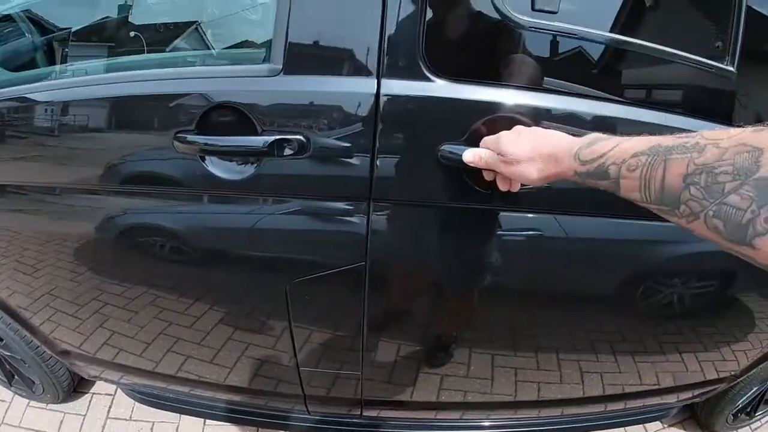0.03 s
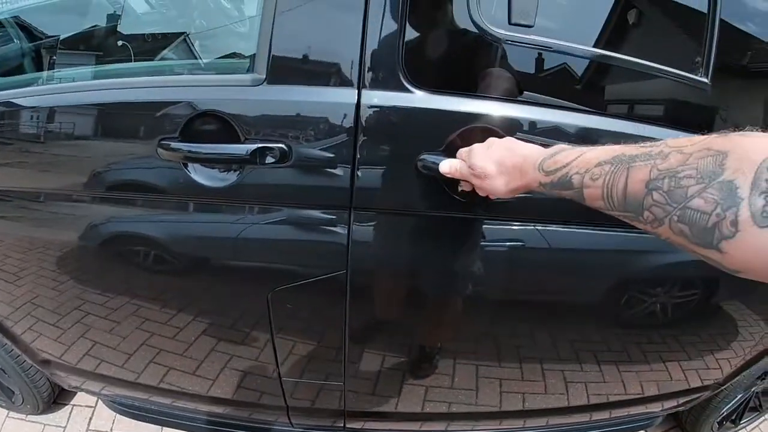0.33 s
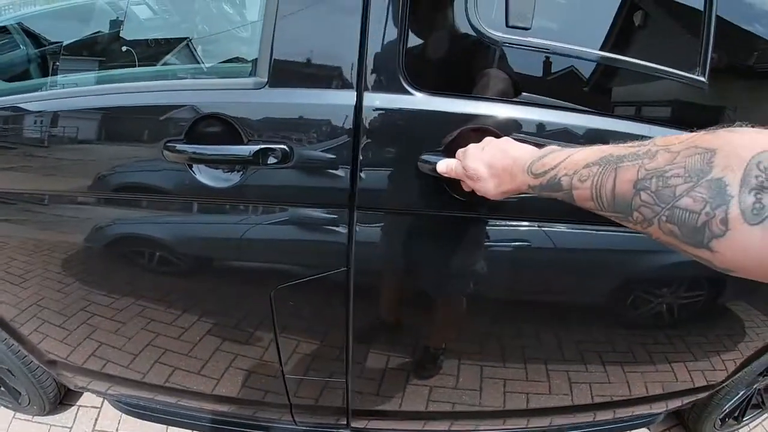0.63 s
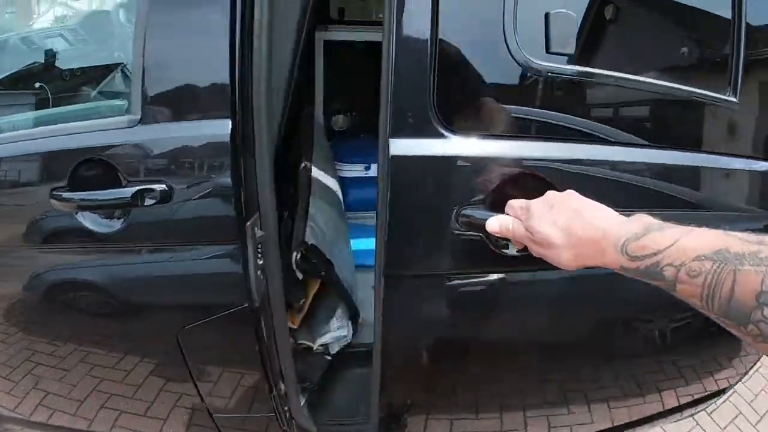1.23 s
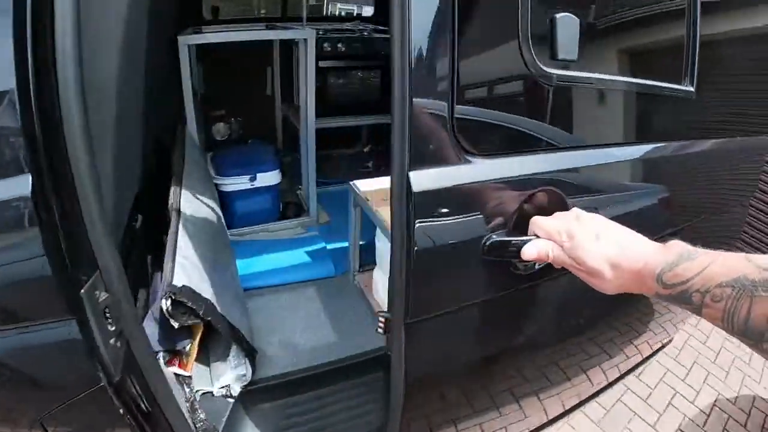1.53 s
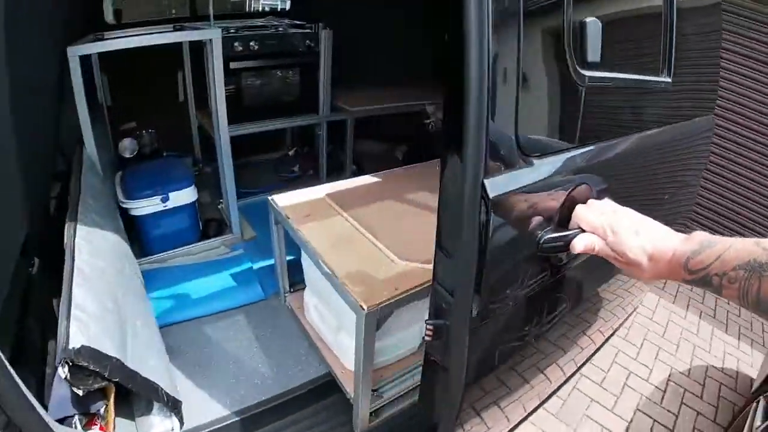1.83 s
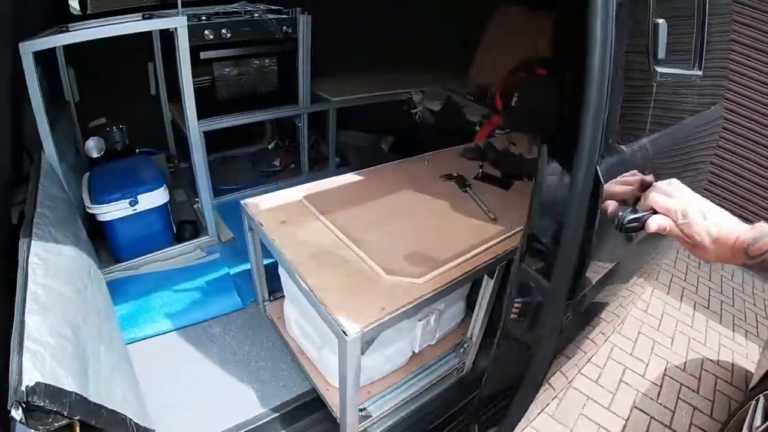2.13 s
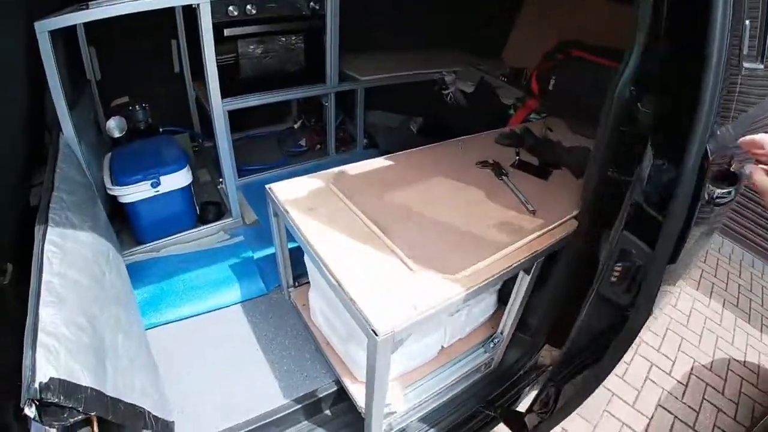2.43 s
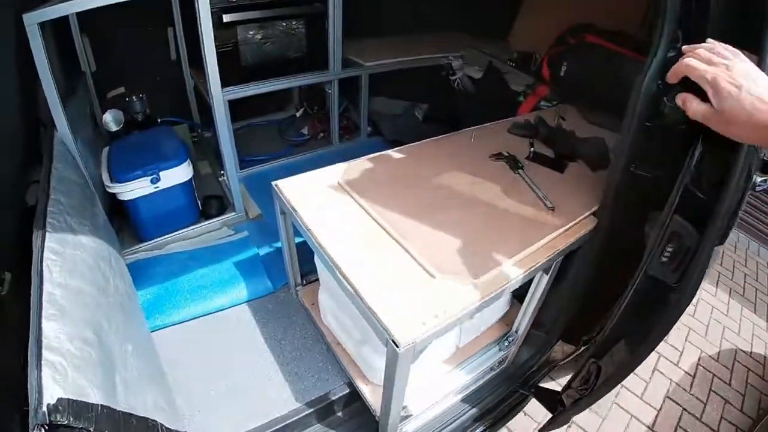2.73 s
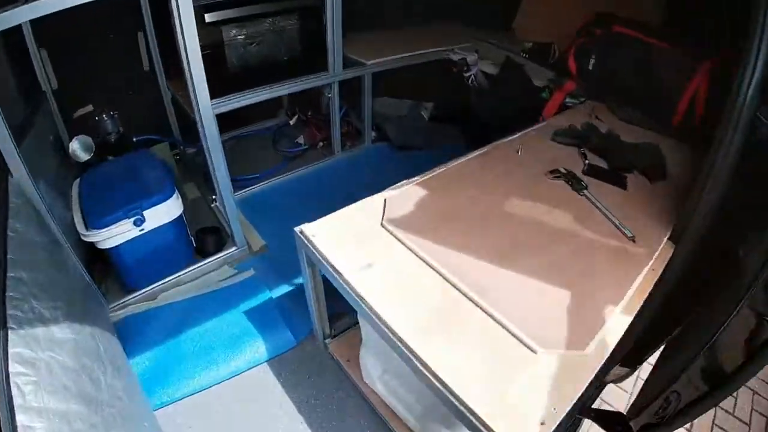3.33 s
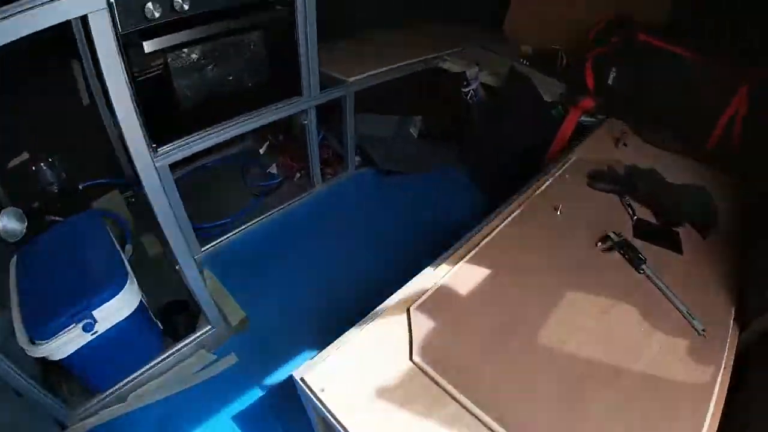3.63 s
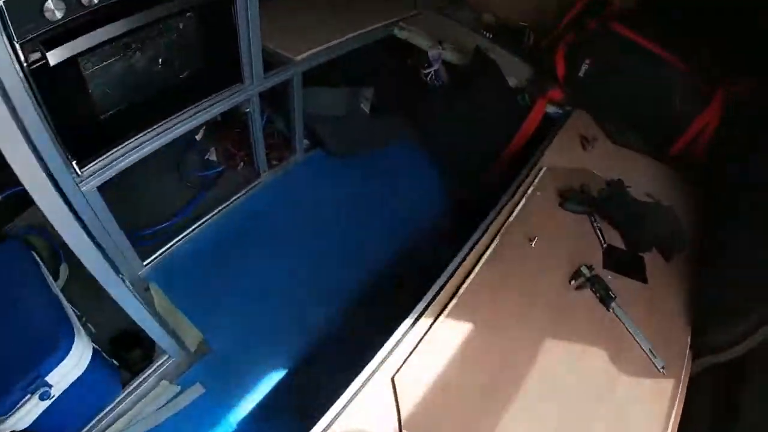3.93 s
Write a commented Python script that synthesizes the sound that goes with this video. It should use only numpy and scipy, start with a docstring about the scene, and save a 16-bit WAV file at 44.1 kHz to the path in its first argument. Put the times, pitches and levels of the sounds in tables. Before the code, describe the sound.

A van's sliding door unlatches, rumbles along its rail and clacks into its catch.

```python
"""A van's sliding door

The door is opened from outside, close to a microphone in light wind. The handle ticks, the latch
lets go with a clunk and the seal peels off; the door rumbles along its rail, bumps, and scrapes into
the hold-open catch. Two footfalls follow on the step. Impacts excite damped modes; rolling, peeling
and rubbing are trains of tiny random contacts, filtered by the bodies they excite."""
import sys
import numpy as np
from scipy.fft import rfft, irfft, next_fast_len
from scipy.io import wavfile
from scipy.ndimage import map_coordinates

SR = 44100
rng = np.random.default_rng(int(sys.argv[2]) if len(sys.argv) > 2 else 0)


def int16_out(signal):
    """Quantize to a 16-bit WAV file."""
    q = np.round(np.clip(np.atleast_2d(signal).T, -1, 1) * 32767)
    wavfile.write(sys.argv[1], SR, q.astype(np.int16))


N = 176400


def amp(db):
    """Amplitude ratio of a level in decibels."""
    return 10 ** (np.asarray(db) / 20)


def unit(x):
    """Normalisation to rms 1."""
    return x / np.sqrt(np.mean(x ** 2) + 1e-20)


def along(points, hz):
    """Interpolation of (f/Hz, value) points on a logarithmic frequency axis."""
    f, values = np.transpose(points)
    return np.interp(np.log(hz + 1), np.log(f + 1), values)


def curves(rows):
    """Linear interpolation in time: one curve for each column after t/s."""
    times, *columns = np.transpose(rows)
    return [np.interp(np.arange(N) / SR, times, column) for column in columns]


def wobble(per_s):
    """Smooth random modulation: a spline through per_s Gaussian values a second."""
    return map_coordinates(rng.standard_normal(2048), [np.arange(N) * per_s / SR], mode="wrap")


def filtered(x, response):
    """Linear filtering: the spectrum of x times a frequency response."""
    size = next_fast_len(len(x) + SR // 4)
    return irfft(rfft(x, size) * response(np.fft.rfftfreq(size, 1 / SR)), size)[:len(x)]


def coloured(x, spectrum):
    """Spectral shaping by (f/Hz, level/dB) points, at rms 1."""
    return unit(filtered(x, lambda hz: amp(along(spectrum, hz))))


def resonate(x, modes):
    """Forced response of parallel resonators (f/Hz, bandwidth/Hz, level/dB)."""
    return filtered(x, lambda f: sum(amp(db) * 1j * f * width / (f0 * f0 - f * f + 1j * f * width)
                                     for f0, width, db in modes))


def grit(per_s):
    """Shot noise: random tiny contacts of uneven size, at rms 1."""
    return unit((rng.random(N) < per_s / SR) * rng.standard_normal(N))


def decay(t, t60, attack_s=0.0014):
    """Exponential damping, 60 dB in t60 seconds, after a quick rise."""
    return np.exp(-np.log(1000) * t / t60) * (1 - np.exp(-t / attack_s))


def blow(spectrum, t60, tilt_db=0):
    """Impact on a panel: dense modes, the high ones dying first; t60 holds at 400 Hz."""
    t = np.arange(SR // 2) / SR
    octave = np.log2(np.fft.rfftfreq(len(t), 1 / SR) + 1)
    noise, out = rfft(rng.standard_normal(len(t))), 0
    for hz in 50 * 2 ** np.arange(9):
        band = irfft(noise * np.cos(np.pi / 2 * np.clip(octave - np.log2(hz), -1, 1)), len(t))
        ratio = hz / 400
        fade = decay(t, t60 / ratio ** 0.3)
        band_db = along(spectrum, hz) + tilt_db * np.log2(min(ratio, 4))
        out = out + unit(band * fade) * np.sqrt(np.mean(fade ** 2)) * amp(band_db)
    return out


def ring(hz, t60):
    """Free vibration of one damped mode."""
    t = np.arange(SR // 2) / SR
    return np.sin(2 * np.pi * hz * t) * decay(t, t60)


def add(out, s, x):
    """Superposition of x on out from time s."""
    part = out[max(round(s * SR), 0):][:len(x)]
    part += x[:len(part)]


# gusts and finest treble hiss (t/s, level/dB)
GUSTS = [(0, -27.5), (0.36, -22.5), (0.45, -35), (0.56, -36), (0.64, -23), (0.9, -27.5), (1.06, -29.5),
         (1.14, -44), (1.24, -32.5), (1.34, -24.5), (1.5, -27.5), (1.56, -23), (1.62, -20.5), (1.7, -20),
         (1.78, -30.5), (1.91, -18.5), (2.04, -33.5), (2.15, -22), (2.45, -26.5), (2.62, -25.5),
         (2.94, -22.5), (3.03, -37.5), (3.28, -22), (3.42, -29), (3.54, -25.5), (3.61, -29), (3.74, -26),
         (3.88, -34.5), (4, -46)]
FIZZ = [(0, -58), (0.12, -66), (0.3, -68), (0.6, -79), (1.0, -91), (3.5, -93.5), (3.6, -61), (3.66, -82),
        (3.85, -72.5), (4, -81)]
# street background (t/s, murmur level/dB, hiss level/dB)
STREET = [(0, -40, -51.5), (0.3, -40.5, -54), (0.55, -38.5, -52.5), (1.0, -41, -56.5), (1.6, -38, -56.5),
          (1.9, -37.5, -60.5), (2.7, -38.5, -61.5), (3.05, -44.5, -60), (3.3, -42.5, -62),
          (3.85, -41.5, -60), (4, -41, -61)]
# their spectra (f/Hz, level/dB)
GUST_SPECTRUM = [(3, -34.5), (12, 4), (25, -3.5), (40, -1), (60, -4), (110, -5.5), (170, -11.5), (260, -20),
                 (450, -30.5), (1000, -46.5), (3000, -79)]
FIZZ_SPECTRUM = [(3000, -26), (6000, 3.5), (9700, -3), (11000, -4.5), (15000, -11.5)]
MURMUR_SPECTRUM = [(40, -6.5), (200, 2.5), (340, 2.5), (450, -6.5), (800, -2.5), (1400, -10), (2300, -15),
                   (3000, -23), (6000, -41), (9000, -60)]
HISS_SPECTRUM = [(300, -13), (1500, -4.5), (2400, 1.5), (3500, 0.5), (5800, -6), (7000, -19.5), (9700, -15),
                 (11000, -27.5), (15000, -44)]

def outdoors():
    """Turbulent pressure: wind buffets the microphone over the broadband noise of the street."""
    gust_db, = curves(GUSTS)
    murmur_db, hiss_db = curves(STREET)
    fizz_db, = curves(FIZZ)
    gusts = amp(gust_db + 0.67 * wobble(17)) * coloured(rng.standard_normal(N), GUST_SPECTRUM)
    murmur = amp(murmur_db + 1.2 * wobble(14)) * coloured(rng.standard_normal(N), MURMUR_SPECTRUM)
    hiss = amp(hiss_db + 0.51 * wobble(20)) * coloured(rng.standard_normal(N), HISS_SPECTRUM)
    fizz = amp(fizz_db) * coloured(rng.standard_normal(N), FIZZ_SPECTRUM)
    return gusts + murmur + hiss + fizz


# rustle as arm and body move (t/s, level/dB) and its spectrum (f/Hz, level/dB)
RUSTLE = [(0.15, -70), (0.25, -50), (0.4, -52), (0.52, -66), (3.05, -70.5), (3.16, -43.5), (3.24, -51.5),
          (3.3, -48), (3.38, -60), (3.48, -37.5), (3.59, -62), (3.64, -58), (3.72, -50), (3.8, -67),
          (3.96, -47.5), (4, -65)]
RUSTLE_SPECTRUM = [(200, -16), (550, -9.5), (850, 4), (1200, 0), (1700, 0), (2600, -11.5), (4500, -21.5),
                   (8000, -36.5), (13000, -48)]

def clothing():
    """Friction noise: cloth rubs in small uneven clumps."""
    db, = curves(RUSTLE)
    return amp(db + 3.4 * wobble(42)) * coloured(grit(1800), RUSTLE_SPECTRUM)


# knocks on handle, arm and rail (t/s, level/dB, tilt/(dB/octave), t60/s)
KNOCKS = [(0.171, -29, -6, 0.083), (0.2252, -23, -2, 0.086), (0.244, -28, -0.5, 0.11),
          (0.2587, -27.5, 5.5, 0.06), (0.329, -28, 6, 0.057), (0.392, -27, 5, 0.078),
          (0.616, -30, -8.5, 0.055), (0.805, -21, -7, 0.035), (1.222, -29.5, 1, 0.062),
          (1.265, -20, -0.5, 0.14), (1.356, -25.5, -6, 0.083), (1.423, -23.5, 1.5, 0.099),
          (1.463, -20.5, -1, 0.077), (1.483, -25.5, -8, 0.061), (1.497, -21.5, 0, 0.13),
          (1.602, -20, -4, 0.11), (1.619, -25, -3.5, 0.17), (1.686, -22.5, -2, 0.037),
          (1.725, -26.5, -7, 0.086), (1.825, -23.5, -4, 0.069), (1.886, -22, -1.5, 0.081),
          (2.134, -22, 4.5, 0.082), (2.319, -23, -2, 0.11), (2.504, -20.5, 1, 0.13),
          (2.5145, -15.5, -1.5, 0.055), (2.54, -22, 8, 0.049), (2.685, -25.5, 0.5, 0.067),
          (2.711, -20.5, 7, 0.072), (2.731, -22.5, 8, 0.043), (2.755, -33.5, -9.5, 0.1),
          (2.794, -27.5, -5.5, .09), (2.829, -22.5, -3.5, 0.13), (2.836, -25.5, 11.5, 0.041),
          (2.864, -30, 9.5, 0.088), (2.895, -24, 6.5, 0.038)]
# snaps of handle and roller arm, ticks of metal fittings (t/s, level/dB)
SNAPS = [(0.178, -36.5), (0.259, -42), (0.6665, -44), (0.672, -35.5), (0.733, -51), (0.679, -45.5),
         (1.115, -47.5), (1.692, -52), (3.746, -50)]
TICKS = [(0.2262, -41.5), (0.47, -42), (0.667, -36), (0.6795, -28), (0.806, -42), (1.467, -41.5),
         (1.671, -40.5), (2.7046, -42), (3.4556, -34.5), (3.525, -49), (3.6885, -46)]
# octave-band spectra of the hollow door and those parts (f/Hz, level/dB)
DOOR_SPECTRUM = [(50, -14), (120, -8.5), (250, 5.5), (500, -8), (1000, -15.5), (2000, -31.5), (4000, -53),
                 (8000, -55.5), (14000, -75)]
SNAP_SPECTRUM = [(200, -25), (1000, -8.5), (3000, 1), (6400, -2.5), (12800, -19)]
TICK_SPECTRUM = [(200, -27.5), (1000, 3), (2500, 5), (5000, -15.5), (8000, -31), (14000, -43)]

def door_knocks():
    """Impact excitation: the large panel sounds low, its small fittings high and short."""
    out = np.zeros(N)
    for s, db, tilt_db, t60 in KNOCKS:
        add(out, s, amp(db) * blow(DOOR_SPECTRUM, t60, tilt_db))
    for s, db in SNAPS:
        add(out, s, amp(db) * blow(SNAP_SPECTRUM, t60=0.04))
    for s, db in TICKS:
        add(out, s, amp(db) * blow(TICK_SPECTRUM, t60=0.051))
    return out


# blows of the pawl (t/s, level/dB, t60/s) and their octave-band spectrum (f/Hz, level/dB)
PAWL_BLOWS = [(0.665, -12.5, 0.057), (0.6691, -14.5, 0.039), (0.679, -21, 0.19)]
PAWL_SPECTRUM = [(50, -6), (120, -20), (250, -5.5), (500, 4.5), (1000, -7.5), (2000, -15.5), (4000, -26),
                 (8000, -39), (14000, -51)]
# modes of latch and panel (f/Hz, relative level/dB, t60/s)
LATCH_MODES = [(192.5, 4.5, 0.14), (264, -3, 0.26), (337, -8, 1), (446, -7, 0.068), (637, -5, 0.12),
               (833, 2, 0.13), (1216, -18.5, 0.64), (1310, -16, 0.15), (1660, -10, 0.19), (1710, -8, 0.14),
               (2070, -20, 0.21), (2344, -24, 0.2), (2837, -18, 0.18), (3100, -25, 0.15), (3220, -19, 0.13),
               (3670, -26, 0.11)]

def latch():
    """Modal ringing: the pawl lets go in three quick blows, the first exciting latch and panel."""
    out = np.zeros(N)
    for s, db, t60 in PAWL_BLOWS:
        add(out, s, amp(db) * blow(PAWL_SPECTRUM, t60))
    first_s, first_db, _ = PAWL_BLOWS[0]
    ring_db = first_db - 7.5
    for hz, mode_db, t60 in LATCH_MODES:
        add(out, first_s + rng.uniform(0, 0.00359), amp(ring_db + mode_db) * ring(hz, t60))
    return out


# heavy shoves (t/s, level/dB, f/Hz, t60/s)
THUDS = [(0.677, -8.5, 47, 0.29), (0.795, -12.5, 55, 0.16), (0.889, -21, 69, 0.14), (1.606, -18, 60, 0.14),
         (2.521, -10, 44.7, 0.14), (2.759, -12.5, 45, 0.17), (2.771, -10, 61.4, 0.081),
         (2.79, -13, 95, 0.087), (2.826, -10, 88.5, 0.059), (2.85, -16.5, 52, .35),
         (3.685, -25, 94.5, 0.12)]

def door_thuds():
    """Damped oscillation: each shove sets the whole door vibrating in one low mode."""
    out = np.zeros(N)
    for s, db, hz, t60 in THUDS:
        add(out, s, -amp(db) * ring(hz, t60))
    return out


# peeling of the seal (t/s, level/dB) and the rubber's spectrum (f/Hz, level/dB)
PEEL = [(0.69, -85), (0.728, -34), (0.765, -36), (0.81, -47), (0.87, -72), (1.05, -77)]
RUBBER_SPECTRUM = [(100, -11), (300, -0.5), (600, 23.5), (1000, 8), (2200, -1), (3500, -12), (5500, -24.5),
                   (7000, -24.5), (9500, -27.5), (13000, -56)]
# modes of the door frame (f/Hz, bandwidth/Hz, level/dB)
FRAME_MODES = [(620, 65, 6.5), (1180, 34, -3), (1970, 120, -0.5), (2360, 100, -2), (3330, 40, -3),
               (3560, 55, -8)]

def seal():
    """Release of adhesion: the rubber lets go in jerks and rings the frame."""
    db, = curves(PEEL)
    frame = resonate(grit(4500), FRAME_MODES)
    frame = unit(resonate(frame, [(1800, 3800, 0)]))  # broad band-pass
    rubber = coloured(grit(9100), RUBBER_SPECTRUM)
    return amp(db + wobble(140)) * (rubber + amp(-5.5) * frame)


# glide of the whistle (t/s, f/Hz, level/dB)
WHISTLE = [(0.86, 4200, -82), (0.89, 4100, -57), (0.915, 3950, -58), (0.935, 3680, -60), (0.955, 3520, -65),
           (0.985, 3150, -61), (1.03, 2950, -82)]

def whistle():
    """Frequency modulation: a faint thin tone wavers and falls as the door swings out."""
    hz, db = curves(WHISTLE)
    wavering_hz = hz * (1 + 0.0069 * wobble(430))
    return amp(db + 3.4 * wobble(90)) * np.sin(2 * np.pi * np.cumsum(wavering_hz) / SR)


# rolling (t/s, level/dB, relative rail level/dB) and the rumble's spectrum (f/Hz, level/dB)
ROLL = [(1.0, -39, -0.5), (1.11, -28, 2), (1.19, -25, -2.5), (1.235, -27.5, 6.5), (1.275, -24.5, 6),
        (1.31, -25.5, 5.5), (1.41, -29, 5.5), (1.505, -21, -2), (1.56, -27, 5), (1.62, -23.5, -4),
        (1.7, -25.5, -13), (1.74, -24.5, -4), (1.785, -30, -2), (1.835, -20.5, -2.5), (1.9, -27, 1),
        (1.94, -28, -6.5), (2.03, -33, -8.5), (2.15, -24.5, -6.5), (2.25, -31.5, 3), (2.34, -28.5, -12),
        (2.42, -31, -5.5), (2.58, -29, -8), (2.72, -51.5, -14.5)]
RUMBLE_SPECTRUM = [(30, -16), (80, -5), (160, 3), (240, 0), (330, -5), (480, -8.5), (620, -32.5),
                   (900, -24), (1400, -39), (3000, -44.5), (8000, -81.5)]
# modes of the rail (f/Hz, bandwidth/Hz, level/dB)
RAIL_MODES = [(310, 36, -21), (408, 33, 4), (456.7, 40, -3), (510, 45, -15.5)]
# impacts on its joints (t/s, level/dB, f/Hz)
JOINTS = [(1.266, -18, 454), (1.888, -18.5, 413), (2.5128, -11.5, 410)]

def rollers():
    """Rolling noise: grit drums the hollow door and makes the rail sing; each joint rings it briefly."""
    db, rail_db = curves(ROLL)
    rumble = coloured(grit(650), RUMBLE_SPECTRUM)
    rail = resonate(grit(650), RAIL_MODES)
    rail = unit(resonate(rail, [(390, 360, 0)]))  # broad band-pass
    out = amp(db + 0.93 * wobble(25.2)) * (rumble + amp(rail_db - 6) * rail)
    for s, joint_db, hz in JOINTS:
        add(out, s, amp(joint_db) * ring(hz, t60=0.047))
    return out


# rub of the runners (t/s, level/dB) and its spectrum (f/Hz, level/dB)
SLIDE = [(1.05, -85), (1.24, -63), (1.33, -75), (1.46, -61), (1.51, -63), (1.57, -58), (1.68, -53),
         (1.74, -81), (1.89, -64.5), (2.1, -84)]
SLIDE_SPECTRUM = [(500, -18.5), (1500, -1), (3000, 3.5), (5500, -7), (7000, -10), (9800, -14.5),
                  (12000, -28), (15000, -45)]

def runners():
    """Dry friction: the runners rub unevenly along the rail."""
    db, = curves(SLIDE)
    return amp(db + 2.7 * wobble(50)) * coloured(grit(1500), SLIDE_SPECTRUM)


# carriage impacts (t/s, level/dB) and their octave-band spectrum (f/Hz, level/dB)
RATTLES = [(1.395, -28), (1.601, -38), (1.617, -27), (1.627, -25), (1.643, -27), (1.668, -33)]
RATTLE_SPECTRUM = [(200, -32), (400, -2.5), (800, -1.5), (1600, -18), (3200, -20), (12000, -44)]
# modes of the track (f/Hz, bandwidth/Hz, level/dB)
TRACK_MODES = [(715, 63, 0), (830, 58, 2.4), (970, 90, -2)]

def track_rattle():
    """Resonant filtering: the loose roller carriage chatters through the modes of its track."""
    chatter = np.zeros(N)
    for s, db in RATTLES:
        add(chatter, s, amp(db) * blow(RATTLE_SPECTRUM, t60=0.1))
    return resonate(chatter, TRACK_MODES)


# roller's pressure on the steel spring (t/s, level/dB)
PRESSURE = [(2.72, -87), (2.757, -44), (2.78, -29.5), (2.8, -25), (2.813, -30), (2.826, -35), (2.9, -94)]
# modes of the spring (f/Hz, bandwidth/Hz, level/dB)
SPRING_MODES = [(780, 50, 3), (1340, 35, 2.5), (1590, 56, 1), (1520, 25, -2.5), (1770, 29, 3),
                (1920, 50, -1), (2150, 20, 2.5), (2490, 87, -4.5), (2544, 71, 0.5), (2580, 40, -6),
                (2710, 40, -12), (3170, 41, -15), (3530, 140, -12.5), (4900, 48, -7.5), (5300, 200, -14)]
# roller's impacts on entering (t/s, level/dB, tilt/(dB/octave))
CLACKS = [(2.7563, -28.5, 0), (2.7785, -22.5, -1), (2.785, -28, 2), (2.7931, -30, -3.5), (2.8048, -33, 4)]
# spectra of rasp and clacks (f/Hz, level/dB)
RASP_SPECTRUM = [(100, -17.5), (450, -4), (750, 5.5), (1000, -4), (1700, 2.5), (2600, -1), (3000, -18.5),
                 (3700, -8), (4300, -17.5), (4900, -15.5), (5800, -17), (7000, -27.5), (9500, -31.5),
                 (12000, -58), (15000, -78)]
CLACK_SPECTRUM = [(100, -16), (220, -6), (400, -6), (800, 1.5), (1600, -1), (3200, -15), (6400, -22),
                  (13000, -48.5)]

def catch():
    """Stick-slip: the roller clacks and scrapes over the hold-open spring, which rings at every slip."""
    pressure_db, = curves(PRESSURE)
    slips = grit(per_s=4800)
    pressure = amp(pressure_db + 1.36 * wobble(300))  # judder
    spring = resonate(slips * pressure, SPRING_MODES) / np.std(resonate(slips, SPRING_MODES))
    spring = filtered(spring, lambda hz: 1 / (1 + (hz / 6100) ** 6))  # low-pass
    rasp = pressure * coloured(slips, RASP_SPECTRUM)
    out = amp(-2.5) * rasp + amp(-2) * spring
    for s, db, tilt_db in CLACKS:
        add(out, s, amp(db) * blow(CLACK_SPECTRUM, t60=0.035, tilt_db=tilt_db))
    return out


# contacts of heel and sole (t/s, level/dB, tilt/(dB/octave), t60/s)
STEPS = [(3.202, -36.5, 7, 0.076), (3.292, -38, 5.5, 0.18), (3.344, -36.5, 6, 0.062),
         (3.4595, -24, 0, 0.12), (3.467, -23, -1, 0.088), (3.479, -28, 1.5, 0.12), (3.508, -29, -3, 0.13),
         (3.546, -30.5, -5, 0.15), (3.624, -31, 2.5, 0.19), (3.644, -27.5, -1, 0.15),
         (3.667, -32, -7, 0.11), (3.687, -30, -2.5, 0.16), (3.787, -34, -5, 0.18)]
# scuffing of the soles (t/s, level/dB)
SCUFF = [(3.42, -72), (3.458, -29), (3.483, -43.5), (3.51, -42), (3.58, -57), (3.64, -54), (3.69, -49),
         (3.76, -63)]
# their spectra (f/Hz, level/dB)
STEP_SPECTRUM = [(50, -10), (140, 0), (300, -2), (600, -2.5), (1200, -11), (2400, -38.5), (4500, -40),
                 (8000, -51), (14000, -63)]
SCUFF_SPECTRUM = [(100, -13), (450, 3.5), (800, 7.5), (1400, -8), (2400, -6), (5000, -29), (7000, -42.5),
                  (12000, -56)]

def footfalls():
    """Impact and friction: shoes land on the step and scuff over its tread."""
    scuff_db, = curves(SCUFF)
    out = amp(scuff_db) * coloured(grit(1300), SCUFF_SPECTRUM)
    for s, db, tilt_db, t60 in STEPS:
        add(out, s, amp(db) * blow(STEP_SPECTRUM, t60, tilt_db))
    return out


# drone of the load space (t/s, level/dB) and its modes (f/Hz, bandwidth/Hz, level/dB)
DRONE = [(3.75, -67), (3.88, -34.5), (3.97, -28), (4, -32)]
CABIN_MODES = [(172, 14, 3.5), (340, 47, -14), (447, 18, -6)]

def cabin():
    """Cavity resonance: the hollow load space drones as the microphone comes inside."""
    db, = curves(DRONE)
    drone = resonate(rng.standard_normal(N), CABIN_MODES)
    return amp(db) * unit(resonate(drone, [(300, 470, 0)]))  # broad band-pass


def scene():
    """Superposition: all sources sum at one microphone."""
    opening = door_knocks() + latch() + door_thuds() + seal() + whistle()
    sliding = rollers() + runners() + track_rattle() + catch()
    return (outdoors() + clothing() + opening + sliding + footfalls() + cabin())[None]


# treble response of the microphone (f/Hz, level/dB)
MIC_RESPONSE = [(5700, -1.5), (7000, -5), (9800, -8), (11500, -8.5), (15000, -17)]

def record(dry):
    """Band limiting: the microphone dulls the treble and passes nothing above 15 kHz."""
    return filtered(dry[0], lambda hz: amp(along(MIC_RESPONSE, hz)) * (hz < 15000))[None]


dry = scene()
out = record(dry)
int16_out(out)
```